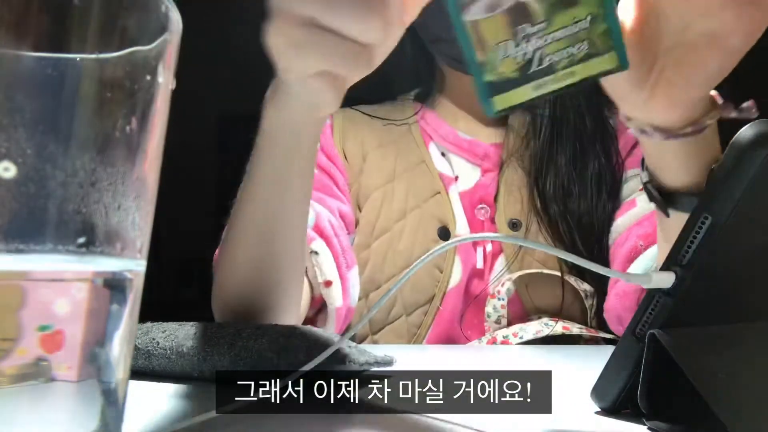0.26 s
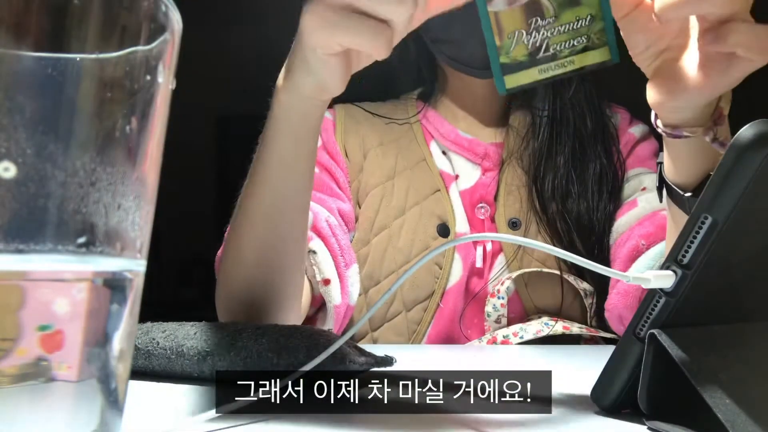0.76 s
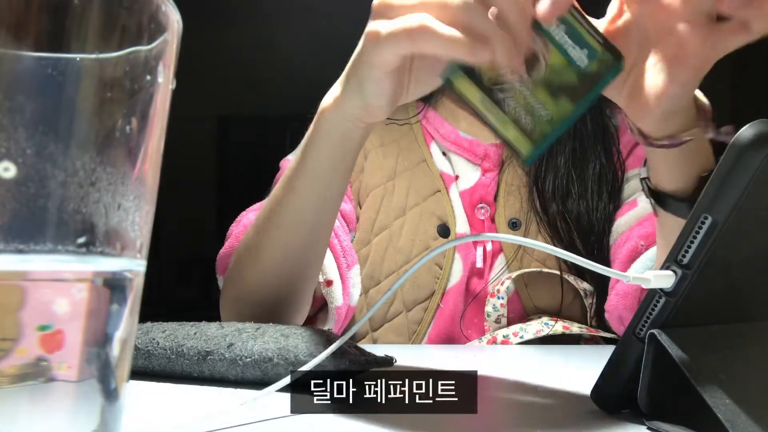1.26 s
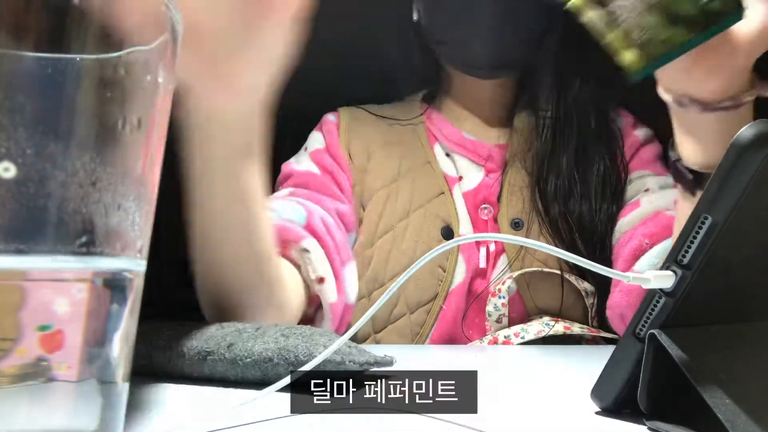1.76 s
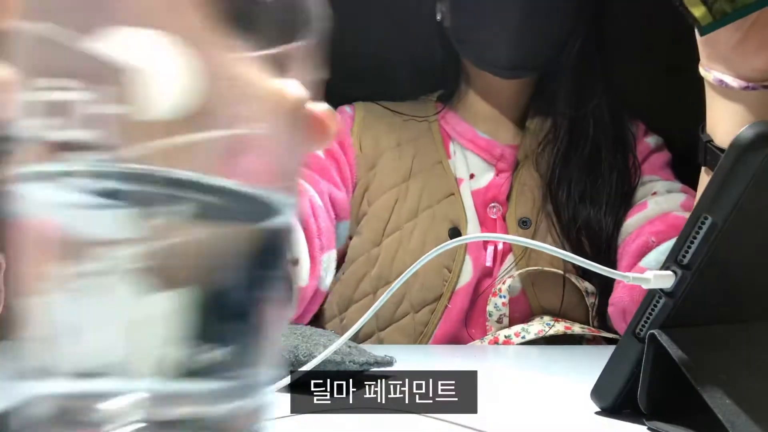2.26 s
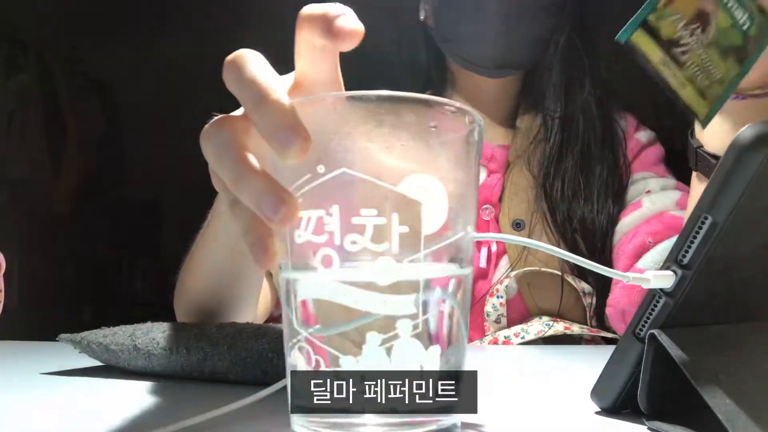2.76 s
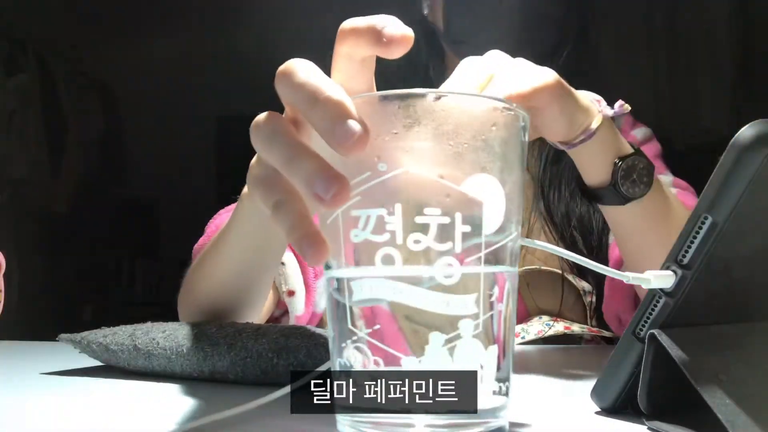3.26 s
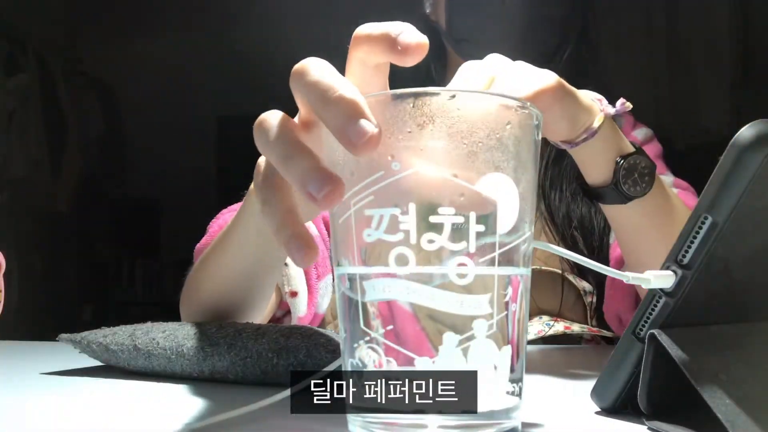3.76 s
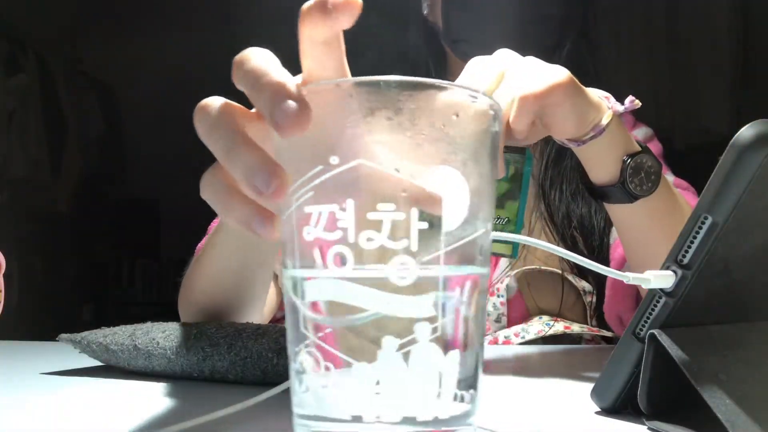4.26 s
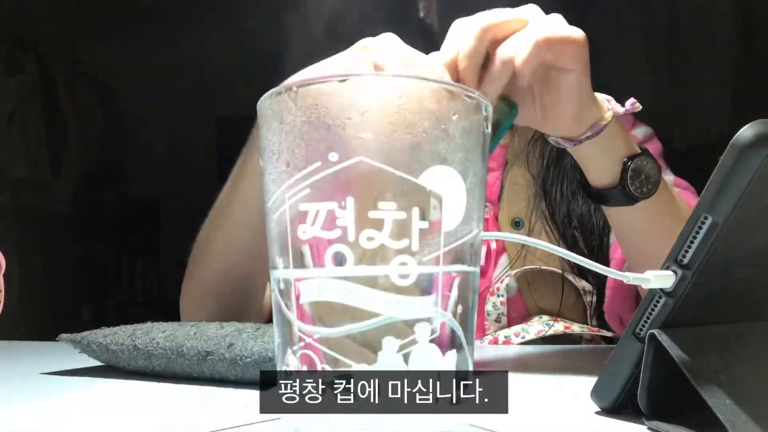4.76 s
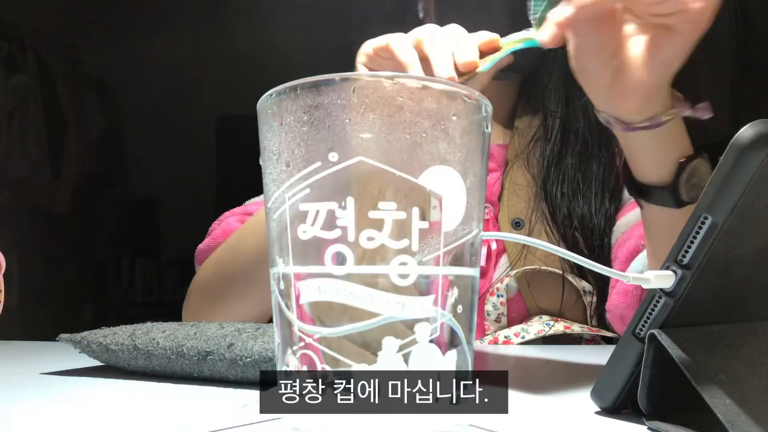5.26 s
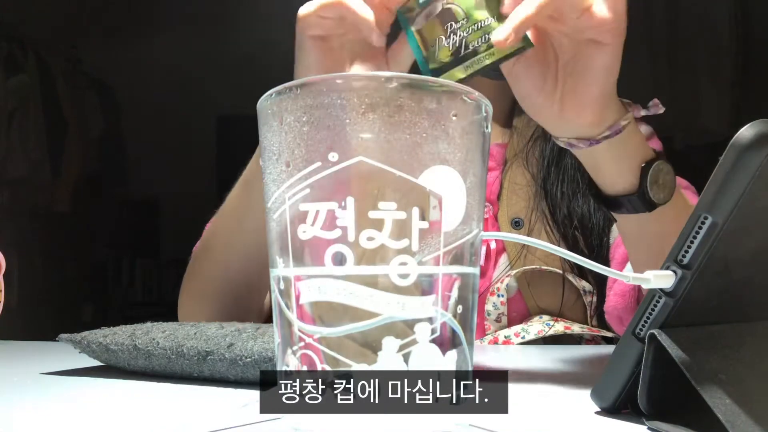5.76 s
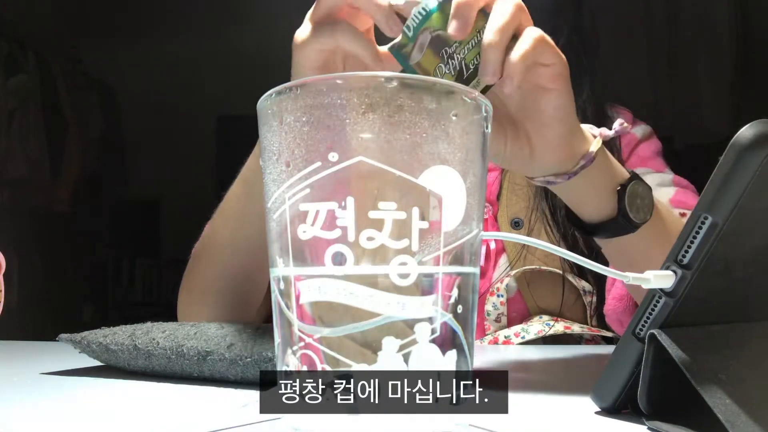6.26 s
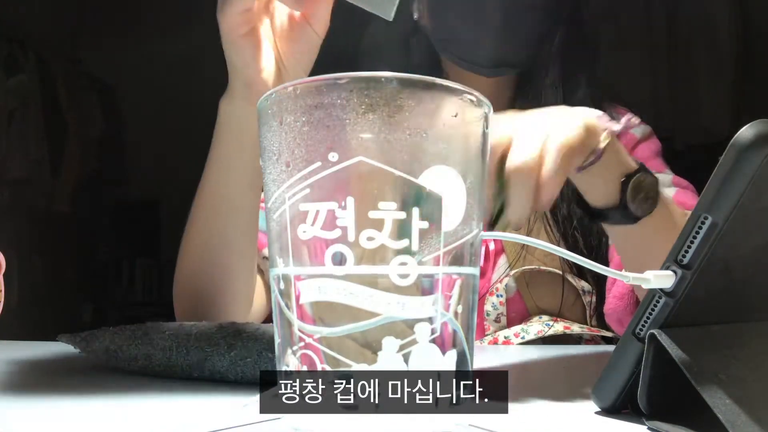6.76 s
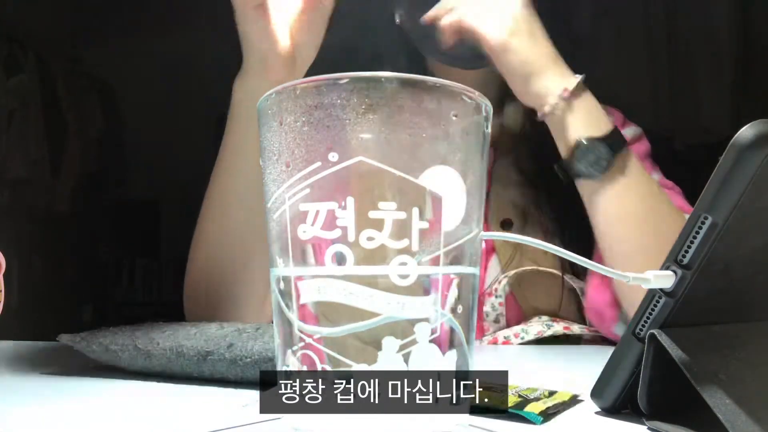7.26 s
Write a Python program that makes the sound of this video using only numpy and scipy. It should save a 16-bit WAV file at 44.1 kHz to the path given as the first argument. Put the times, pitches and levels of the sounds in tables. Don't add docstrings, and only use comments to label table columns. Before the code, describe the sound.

Dry foil sachet crackles in the hands, a full glass knocks hard on a table and scrapes, then the foil tears open with bright crinkles.

```python
import sys
import numpy as np
from scipy import signal
from scipy.fft import rfft, irfft, next_fast_len
from scipy.io import wavfile
from scipy.ndimage import uniform_filter1d, map_coordinates

SR = 44100
rng = np.random.default_rng(int(sys.argv[2]) if len(sys.argv) > 2 else 0)


def materialize(psi):
    bounded = np.clip(np.atleast_2d(psi).T, -1, 1)
    quanta = np.round(bounded * 32767).astype(np.int16)
    wavfile.write(sys.argv[1], SR, quanta)


def magnitude_from_level(level_db):
    exponent = np.asarray(level_db, float) / 20
    return 10 ** exponent


N = 330750

# (ring life [s], ring pitches [Hz])
PANELS = [
    (0.00029, [2103, 2164]),
    (0.00014, [3290, 3930, 4500, 4800]),
    (0.00035, [6020, 6700, 6820, 8110]),
    (0.00032, [9210, 10500, 11430, 12870, 14020, 15960]),
]
PANEL_DB = [-7.5, 1, -2.5, 2.5]
# (time [s], peak level [dB], brightness [dB per panel size], own pitch [Hz])
SHOWING_CREASES = [(.323, -44.5, 2.5, 4240), (.3389, -47.5, -4, 4440), (.3744, -36, -3.5, 6700),
                   (.381, -40, -12, 2320), (.386, -47.5, -1, 1510), (.7948, -46.5, -11, 1950),
                   (.8565, -45, -6, 716), (1.0422, -54.5, -5, 1420), (1.0681, -39, 2, 4620),
                   (1.1112, -38, 0, 4500), (1.22, -42, -11, 4260), (1.2298, -34, 0, 9440),
                   (1.2594, -35, -7, 2238), (1.2958, -50, -6, 2990), (1.3269, -44.5, -1.5, 1090),
                   (1.3602, -39.5, -2, 2930), (1.4512, -49, .1, 1640), (1.4616, -43, 6, 4500),
                   (1.474, -39, -18, 4000), (1.479, -34.5, -1, 3880), (1.495, -48, 2, 4600),
                   (1.504, -51, 6, 4760), (1.517, -46, 2, 4260), (1.5243, -53, 3, 10500),
                   (1.5445, -43, 4, 4300), (1.605, -42, 0, 1240), (1.6101, -43, -2, 12300),
                   (1.6626, -50, -8, 4070), (2.1041, -51, -6, 710), (2.7825, -52, 4.5, 3400)]
# (time [s], peak level [dB], brightness [dB per panel size], own pitch [Hz])
OPENING_CREASES = [(4.5925, -42.5, -24, 1110), (4.592, -40.5, -2, 4060), (4.7577, -43.5, -4.5, 2070),
                   (4.7765, -32.5, -4.5, 6000), (4.8016, -43, -7, 4430), (4.815, -38, 0, 1210),
                   (4.824, -39, 5, 6200), (4.8298, -39, 0, 6200), (4.838, -37, -2, 6130),
                   (4.8443, -35, -6, 4400), (4.8462, -33.5, 0.5, 2020), (4.888, -42.5, 0.5, 2050),
                   (4.947, -53, 6, 12000), (4.957, -49, 7, 6160), (4.973, -37.5, 6, 2040),
                   (5.033, -28, 14, 13300), (5.063, -41.5, 1.5, 4450), (5.0839, -47, 6, 12600),
                   (5.105, -43, 12, 12700), (5.123, -47, 4, 12900), (5.2175, -44.5, 1, 4000),
                   (5.24, -58, 6, 12500), (5.256, -55.5, -2, 1880), (5.4107, -52, -3, 2010),
                   (5.4183, -36, -5, 5800), (5.4513, -55, -12, 2000), (5.462, -49, -5, 1880),
                   (5.481, -51, 0.5, 4500), (5.538, -38.5, -1, 6070), (5.55, -44.5, -1, 1120)]
# (time [s], peak level [dB], brightness [dB per panel size], own pitch [Hz])
EMPTYING_CREASES = [(5.669, -50.5, -5.5, 1900), (5.675, -46.5, -11, 1940), (5.721, -39.5, -1.5, 2000),
                    (5.7208, -41, -1.5, 770), (5.695, -58, -4, 1950), (5.7447, -50, -2.5, 2020),
                    (5.804, -47.5, -13, 1120), (5.8624, -50, -4.5, 2150), (5.882, -34.5, -6.5, 4250),
                    (5.942, -48, -2, 2200), (6.118, -46, -5, 6300), (6.121, -55, -8, 1930),
                    (6.158, -35, 0.6, 1860), (6.1686, -53, .1, 2450), (6.188, -45, -2.5, 2040),
                    (6.2076, -41.5, -5, 740), (6.4408, -39.5, -0.5, 2030), (6.589, -52, -1.5, 2020),
                    (6.602, -46.5, 0, 6160), (6.609, -49.5, -1, 5930), (6.9846, -49, -7, 1210),
                    (7.026, -46, -5, 800), (7.04, -45, 4, 11900), (7.0585, -37, -10, 1230),
                    (7.057, -34.5, 8, 9400), (7.0863, -42.5, -2, 4000), (7.0883, -39, -10, 1290),
                    (7.093, -44, -19, 700), (7.1133, -53, -3.5, 734)]
# (time [s], peak level [dB], brightness [dB per panel size], own pitch [Hz])
MORE_CREASES = [(1.4674, -52, 0, 4770), (1.4912, -46.5, 3, 3140), (1.5127, -55, 0, 4500), (1.531, -55, 1, 3530),
                (1.587, -58, 6, 13500), (4.615, -60, 2.5, 5470), (4.671, -64, -1.5, 4030), (4.716, -62, -1, 6300),
                (4.727, -61, -4, 4500), (4.765, -46.5, -10.5, 1010), (4.8125, -40, -6, 4400),
                (4.835, -51, -4, 6170), (4.8543, -37, -7.5, 4230), (4.8605, -43, 8, 6160),
                (4.8976, -47, 1.5, 6190), (4.9321, -56, 8, 11350), (4.9368, -57, 9, 11950),
                (4.9505, -49, 8, 14600), (4.9856, -36, 7, 8300), (4.9973, -42, 5, 13900), (5.0083, -41, 5, 12200),
                (5.03, -48, -4, 4100), (5.0372, -46, 4, 8400), (5.0497, -36, 8, 12430), (5.0749, -43, 8, 13100),
                (5.1418, -53, 10, 13160), (5.1464, -49, 6, 14800), (5.213, -57, -12, 2000), (5.366, -65, 6, 12000),
                (0.375, -38.5, 0, 3060), (5.392, -58, -2, 4500), (5.493, -55, -2, 2000), (5.533, -58, 2, 6060),
                (5.667, -56, -3, 14000), (6.1992, -60, 0, 6100), (6.4516, -57, -3, 4770), (6.567, -53, -14, 2000),
                (1.207, -61, 1, 10500), (1.2165, -57, -7, 8000), (.3715, -38.5, 1, 5230), (7.0265, -49, -9, 2480),
                (7.081, -57, 3, 7000), (7.0285, -47, -14, 900), (7.092, -46, -16, 1290)]
# (frequency [Hz], level [dB per Hz])
FOIL_BODY = [(1800, -44), (2600, -1), (3400, 0), (4300, -1.5), (4950, 2.5), (5500, -2), (6100, -1),
             (6600, -9.5), (7300, -3), (8000, -26)]
# (frequency [Hz], level [dB per Hz])
FOIL_SIZZLE = [(7000, -48), (7550, -17), (8050, -2.5), (8700, -12), (9900, -8.5), (11000, -8),
               (13300, -2.5), (14800, -7.5), (15700, -6.5), (16200, -41.5)]
# (frequency [Hz], level [dB per Hz])
FOIL_RASP = [(400, -3.5), (700, 5.5), (1200, 1), (2000, -0.5), (2500, -2), (3000, -47)]
# (frequency [Hz], width [Hz], share lost [0 to 1])
SHADOWS = [
    (5530, 210, 0.38),
    (7440, 400, 0.37),
    (16200, 700, 0.55),
]
# (peak time [s], rise [s], fall [s], level [dB], brightness [dB])
RUBS = [(.31, 0.034, 0.077, -74, -15), (.385, 0.012, 0.01, -57.5, -21), (1.222, 0.01, 0.027, -57, 0),
        (1.452, 0.012, 0.17, -59.5, -5.5), (1.495, 0.12, 0.13, -65.5, 0), (1.61, 0.091, .05, -65, -3),
        (5.22, 0.022, .025, -62, -6), (5.28, 0.098, 0.059, -68.5, 1), (5.43, 0.11, .3, -69.5, -7),
        (5.54, 0.29, 0.16, -68.5, -4), (5.73, 0.34, 0.39, -74, -7), (5.92, 0.97, 0.14, -74.5, 0),
        (6.17, 0.051, 0.13, -64, -7), (6.25, 0.38, .05, -66.5, -3), (6.37, 0.15, 0.37, -69.5, -2),
        (6.455, 0.074, .05, -72, -5), (6.54, .1, 0.18, -75, 5), (6.605, 0.094, .018, -63.5, 1.5),
        (6.86, .04, .06, -73.5, 3), (6.931, .008, 0.094, -64, -3), (6.954, 0.087, 0.012, -77, -6),
        (6.985, 0.073, .04, -74, 5), (7.095, 0.035, 0.065, -69, 5)]
# (peak time [s], rise [s], fall [s], level [dB], brightness [dB])
TEAR_SURGES = [(4.78, 0.041, 0.074, -61, 1), (4.846, 0.011, 0.11, -50.5, 2),
               (4.885, 0.057, 0.041, -56.5, 5.5), (4.948, .008, .2, -64, 7), (4.975, .012, .1, -52.5, 6),
               (4.999, 0.063, 0.15, -50, 6), (5.03, 0.074, 0.2, -58.5, -4.5), (5.07, .1, 0.05, -63.5, 12.5),
               (5.13, .04, 0.072, -60, 4.5), (5.159, 0.15, 0.015, -63.5, -4.5)]
# (peak time [s], rise [s], fall [s], level [dB], pitch [Hz])
TAUT_PANELS = [(1.456, .015, .09, -65, 6500), (1.548, .02, 0.037, -74, 6400),
               (1.606, 0.025, .03, -75, 7040), (4.83, 0.027, 0.06, -47.5, 6150),
               (4.85, 0.028, 0.069, -49, 4260), (4.86, 0.046, 0.083, -53, 6150),
               (4.955, 0.03, .04, -60, 5960), (4.985, 0.041, .08, -62, 8250),
               (5.025, 0.079, 0.1, -51, 4500), (5.03, .1, 0.11, -54, 4040), (1.5, 0.12, .15, -66, 4910),
               (1.53, .15, .06, -77, 6500), (5.065, .04, 0.15, -57.5, 9000), (5.155, .05, 0.021, -61, 2280),
               (5.28, 0.09, 0.053, -74, 4500), (5.28, .08, .06, -72, 14030), (5.82, 0.078, .03, -66, 2100),
               (5.925, 0.029, 0.067, -64, 6200), (6.24, 0.083, .08, -67.5, 5950),
               (6.4, .25, 0.11, -75.5, 7960), (6.46, .03, 0.047, -66, 4500), (6.59, 0.16, .05, -68, 6060),
               (6.945, 0.025, 0.024, -57.5, 6800), (6.942, 0.038, 0.058, -66, 8800),
               (6.95, 0.038, 0.024, -63.5, 4150), (7.095, 0.039, 0.023, -61, 3690),
               (6.23, .1, .06, -67, 7840), (6.56, .15, 0.092, -73, 7930), (4.87, 0.044, 0.036, -56, 1463),
               (5.03, 0.11, 0.11, -55.5, 2180)]
# (time [s], peak level [dB], pitch [Hz])
FACETS = [(.3744, -54, 13300), (1.0685, -54, 9500), (1.0681, -51, 12000), (1.2298, -45, 10720),
          (1.2576, -50, 8660), (1.3602, -57, 9800), (1.36, -48, 12200), (4.591, -58, 3900),
          (4.7766, -49.5, 11540), (4.7769, -44, 13200), (4.778, -49, 1100), (5.4188, -50, 10740),
          (5.4188, -52, 13970), (5.883, -50.5, 6180), (6.158, -44, 4800), (6.157, -47, 12700),
          (6.4405, -40, 4770), (6.4408, -47.5, 10700), (5.065, -48, 8950), (5.038, -41, 12600),
          (1.504, -49, 4740), (1.504, -52, 13500), (4.132, -49, 2050), (4.131, -61, 4700),
          (4.052, -54, 1960), (1.0683, -51, 14000), (1.23, -46, 6900), (4.7567, -44, 4150),
          (4.757, -50, 7000), (4.838, -39, 13300), (4.8445, -42, 12300), (6.4406, -41, 4170),
          (6.4408, -45, 8030), (7.087, -43, 3840), (7.0872, -51, 14400), (7.0876, -44, 584),
          (2.5481, -54.5, 4380), (5.7212, -46, 6400)]
# (pitch [Hz], level [dB], time to fade by 60 dB [s])
TABLE_RINGS = [(153, 1, 0.063), (212, 2, 0.028), (249, 0, 0.059), (335, -3.5, 0.023), (428, 3, 0.035),
               (478, -2, 0.05), (590, -9, 0.048), (617, -24.5, 0.0489), (768, -2.5, 0.03), (920, -7, 0.019),
               (1060, -10, 0.01), (1210, -1, 0.015), (1335, -17.5, 0.035), (1580, -13, 0.023),
               (1984, -4.5, 0.014), (2810, -15.5, 0.018), (3370, -35, 0.092), (4890, -8.5, 0.0064),
               (6150, -18, 0.0077), (8250, -13.5, 0.0038)]
# (time [s], force [dB], contact hardness [Hz])
KNOCKS = [(2.438, -38, 710), (2.4428, -16.5, 3000), (2.4465, -35.5, 1300), (2.458, -41, 590),
          (2.478, -29.5, 1100), (2.5489, -36, 2970), (2.551, -25, 680), (2.565, -53, 600),
          (2.703, -40, 249), (2.001, -40, 296), (7.023, -48, 900), (7.089, -48.5, 1500)]
# (peak time [s], rise [s], fall [s], level [dB], brightness [dB])
SLIDE_SURGES = [(2.07, 0.15, .06, -53.5, -32), (2.102, 0.056, 0.064, -45, -22),
                (2.452, 0.0072, 0.062, -44, -2), (2.48, .006, 0.047, -54, -6),
                (2.556, 0.0072, 0.026, -56, 3), (2.58, 0.074, 0.13, -46, -17),
                (2.72, 0.085, 0.17, -61.5, -13), (2.915, 0.053, 0.24, -48, -13.5),
                (2.97, 0.17, 0.13, -47.5, -12), (3.01, 0.36, 0.11, -50, -22),
                (3.24, 0.19, 0.22, -60.5, -12), (3.32, .1, 0.078, -65, -4.5), (4.02, 0.3, .1, -63.5, -10),
                (4.062, 0.038, 0.14, -52.5, -8.5), (4.105, 0.14, 0.39, -47, -17),
                (4.145, 0.27, 0.14, -50, -6.5), (4.225, 0.28, 0.054, -55, -4.5),
                (4.285, .1, 0.076, -64, -4)]
# (peak time [s], rise [s], fall [s], level [dB], pitch [Hz])
CHATTER = [
    (2.1, .09, .09, -47, 490),
    (4.105, .12, .22, -47, 255),
    (4.143, .04, .12, -48, 420),
    (4.232, .3, .04, -49, 500),
    (4.285, .05, .05, -60, 430),
]
# (time [s], peak level [dB], pitch [Hz])
THUMPS = [(0.159, -40.5, 101), (0.282, -50, 131), (1.218, -44.5, 125), (1.455, -44, 130), (2.043, -34, 420),
          (2.056, -36.5, 406), (6.601, -57, 209), (2.1, -45, 104), (2.909, -46, 115), (2.4436, -25, 425),
          (2.4446, -36, 232), (2.5635, -35, 392)]
# (frequency [Hz], time to fade by 60 dB [s])
ROOM_FADE = [(200, 0.13), (2000, 0.034), (12000, 0.043)]
# (frequency [Hz], level [dB per Hz])
AIR_COLOUR = [(15, -75), (25, -30), (117, 1), (231, -4), (279, -3), (311, -4.5), (420, -4.5), (536, -4),
              (742, -6), (1240, -9), (1590, -12), (1720, -10.5), (3390, -18.5), (9200, -24.5),
              (9900, -29.5), (10600, -24.5), (12800, -26), (15850, -28.5), (16050, -47.5)]

FADE_DB = 33.5


def snaps():
    own_db = 7
    out, t = np.zeros(N + SR), np.arange(660) / SR
    strain = np.zeros(N)
    creases = SHOWING_CREASES + OPENING_CREASES + EMPTYING_CREASES + MORE_CREASES
    chance = rng.random((len(creases), len(PANELS), 6, 4))
    for (s, peak_db, bright_db, own_hz), draw in zip(creases, chance):
        lean_db = bright_db * np.arange(len(PANELS)) + PANEL_DB
        own = np.searchsorted([3200, 5500, 8600], own_hz)
        lean_db[own] += own_db
        levels = peak_db + lean_db - lean_db.max()
        strain[round(s * SR)] = magnitude_from_level(levels[1:].max() - 22.5)
        for k, (db, (life, pitches), rings) in enumerate(zip(levels, PANELS, draw)):
            bend, strength, phase, late = rings[:len(pitches)].T[..., None]
            hz = np.array(pitches)[:, None] * (1 + 0.075 * (bend - .5))
            if k == own:
                hz[0], strength[0] = own_hz, 0
                strength[1:] += 0.44 * (own_hz < 1600)
            u = np.maximum(t - 0.0008 * late, 0) / life
            swing = np.sin(2 * np.pi * (hz * t + phase))
            flick = np.sum(magnitude_from_level(-13 * strength) * u ** 2 * np.exp(-u) * swing, axis=0)
            out[round((s - .0013) * SR):][:len(t)] += magnitude_from_level(db + 2.0) * flick / abs(flick).max()
    swell = signal.oaconvolve(strain, np.exp(-abs(t - t.mean()) / 0.0031), "same")
    creep = unit(filtered(grit(9000, spread_db=5, clump_db=3), creep_colour))
    return filtered(out[:N], lambda hz: table_mirror(hz) * hand_shadow(hz)) + swell * creep


def creep_colour(hz):
    seam_hz, width_hz, seam_db = 6280, 140, 9
    seam = magnitude_from_level(seam_db) / (1 + (2 * (hz - seam_hz) / width_hz) ** 2)
    total = magnitude_from_level(along(FOIL_BODY, hz)) + seam + magnitude_from_level(along(FOIL_SIZZLE, hz) - 2.5)
    return total / (1 + (4500 / (hz + 1)) ** 6)


def table_mirror(hz):
    delay_s, gain, blur_hz = 0.000468, 0.076, 10800
    bounce = gain * np.exp(-2j * np.pi * hz * delay_s) / (1 + (hz / blur_hz) ** 4)
    return 0.94 + bounce / (1 + (2300 / (hz + 1)) ** 4)


def hand_shadow(hz):
    dips = [1 - min(share, 1) / (1 + ((hz - c_hz) / w_hz) ** 2) for c_hz, w_hz, share in SHADOWS]
    return np.prod(dips, axis=0)


def rustle():
    rasp_lean = 0.87
    rub_rasp_db, tear_rasp_db = -5, 0
    leans = [0, 1, -rasp_lean]
    rub_gains = strokes(RUBS, leans, [0, 0, rub_rasp_db])
    tear_gains = strokes(TEAR_SURGES, leans, [0, 0, tear_rasp_db])
    gains = np.maximum(rub_gains, tear_gains)
    shared = 0.53 * unit(grit(3000, spread_db=1.5, clump_db=1.0))
    layers = []
    for colour in (FOIL_BODY, FOIL_SIZZLE, FOIL_RASP):
        own_slips = unit(grit(7000, spread_db=2.5, clump_db=2.5))
        slips = patchy(shared + own_slips, 2, 7, 5)
        layers.append(unit(filtered(slips, lambda hz: magnitude_from_level(along(colour, hz)))))
    return np.sum(gains * layers, axis=0)


def taut_foil():
    return pitched_slips(TAUT_PANELS, width_hz=240, clump_db=3.0, tone=0)


def facets():
    out, t = np.zeros(N), np.arange(300) / SR
    u = t / 0.00067
    for s, db, hz in FACETS:
        ring = u ** 2 * np.exp(-u) * np.sin(2 * np.pi * hz * t)
        out[round((s - .0009) * SR):][:len(t)] += magnitude_from_level(db + 5.3) * ring
    return out


def glass():
    force = np.zeros(N)
    t = np.arange(900) / SR
    for s, db, hard_hz in KNOCKS:
        u = 2 * np.pi * hard_hz * t
        push = u ** 2 * np.exp(-u)
        force[round(s * SR):][:len(t)] += magnitude_from_level(db) * push / push.sum()
    return filtered(force, lambda hz: table_response(hz, damp=0.75, tilt_db=2.5))


def table_response(hz, damp, tilt_db):
    total = 0
    for k, (centre, db, t60) in enumerate(TABLE_RINGS):
        width = damp * np.log(1000) / (np.pi * t60)
        side = (-1) ** min(k, 17) if centre > 1000 else 1
        strength = side * magnitude_from_level(db + tilt_db * np.log2(centre / 500))
        total = total + strength * centre / (centre ** 2 - hz ** 2 + 1j * hz * width)
    radiation = (1j * hz / (100 + 1j * hz)) ** 5
    lag = np.exp(-2j * np.pi * 0.021 * np.sqrt(hz))
    earlier = np.exp(2j * np.pi * hz * 0.00024)
    return total * radiation * lag * earlier * SR / (2 * np.pi)


def slide():
    dull, bright = strokes(SLIDE_SURGES, [0, 1], [0, 0])

    def low_colour(hz):
        ring = table_response(hz, damp=1.0, tilt_db=-0.5)
        return ring / (1 + (hz / 800) ** 4) / (1 + (215 / (hz + 1)) ** 4)

    def high_colour(hz):
        rim = 1
        for c_hz, w_hz, gain in ((2040, 72, 0.0), (2700, 380, -.5), (3400, 43, 1.5)):
            rim = rim + gain / (1 + ((hz - c_hz) / w_hz) ** 2)
        ring = table_response(hz, damp=0.75, tilt_db=2.5) * rim
        return ring / (1 + (900 / (hz + 1)) ** 6) / (1 + (hz / 4000) ** 8)

    low = filtered(grit(700, spread_db=1.0, clump_db=-2.0), low_colour)
    high = filtered(grit(1500, spread_db=-1.5, clump_db=1.5), high_colour)
    return dull * steady(low) + bright * steady(high)


def chatter():
    return pitched_slips(CHATTER, width_hz=37, clump_db=4.0, tone=4)


def thumps():
    out, t = np.zeros(N), np.arange(4000) / SR
    for s, db, hz in THUMPS:
        u = t * np.sqrt(hz) / 0.065
        out[round(s * SR):][:len(t)] += magnitude_from_level(db + 4.5) * u * np.exp(-u) * np.sin(2 * np.pi * hz * t)
    return out


def room(x):
    out, hop = np.zeros(N + SR), SR // 5
    for start in range(0, N, hop):
        hz, t, z = signal.stft(rng.standard_normal(hop), SR, nperseg=128)
        fade = magnitude_from_level(-60 * t / along(ROOM_FADE, hz)[:, None])
        tail = signal.istft(z * fade, SR, nperseg=128)[1]
        wet = signal.fftconvolve(x[start:start + hop], tail / np.linalg.norm(tail))
        out[start + 40:][:len(wet)] += wet
    return out[:N]


def air():
    noise = patchy(rng.standard_normal(N), 1.2, 6, 14)
    return magnitude_from_level(-65) * unit(filtered(noise, lambda hz: magnitude_from_level(along(AIR_COLOUR, hz))))


def grit(rate, spread_db, clump_db):
    hit = rng.random(N) < rate / SR
    size_db = spread_db * np.minimum(rng.exponential(size=N), 3)
    size = magnitude_from_level(size_db) * np.sign(rng.standard_normal(N))
    clumps = map_coordinates(rng.standard_normal(N // 150 + 4), [np.arange(N) / 150])
    return hit * size * magnitude_from_level(clump_db * clumps)


def pitched_slips(rows, width_hz, clump_db, tone):
    out, t = np.zeros(N), np.arange(N) / SR
    slips = grit(4000, spread_db=3.5, clump_db=clump_db)
    slips = filtered(slips, lambda hz: 1 / (1 + (hz / width_hz) ** 3))
    slips = unit(tone + steady(slips))
    for k, (s, rise, fall, db, hz) in enumerate(rows):
        i = slice(round((s - 3 * rise) * SR), round((s + 3 * fall) * SR))
        away = np.maximum((s - t[i]) / max(rise, .002), (t[i] - s) / max(fall, .002))
        rough = np.roll(slips, 9001 * k)[i]
        out[i] += magnitude_from_level(db - FADE_DB * away + 3) * rough * np.sin(2 * np.pi * hz * t[i])
    return out


def strokes(rows, leans, offsets_db):
    gains = np.zeros((len(leans), N))
    for s, rise, fall, db, bright_db in rows:
        i = np.arange(max(round((s - 3 * rise) * SR), 0), min(round((s + 3 * fall) * SR), N))
        t = i / SR - s
        level_db = db - FADE_DB * np.maximum(-t / max(rise, .002), t / max(fall, .002))
        layer_db = (bright_db * np.array(leans) + offsets_db)[:, None]
        gains[:, i] = np.maximum(gains[:, i], magnitude_from_level(level_db + layer_db))
    return uniform_filter1d(gains, size=131, axis=1)


def patchy(x, depth_db, bins, frames):
    z = signal.stft(x, nperseg=512)[2]
    field = uniform_filter1d(rng.standard_normal(z.shape), bins, axis=0)
    field = uniform_filter1d(field, frames, axis=1)
    return signal.istft(z * magnitude_from_level(depth_db * unit(field)), nperseg=512)[1][:N]


def steady(x):
    return x / np.sqrt(abs(uniform_filter1d(x ** 2, size=2205)) + 1e-20)


def filtered(x, response):
    m = next_fast_len(N + SR // 4)
    return irfft(rfft(x, m) * response(np.fft.rfftfreq(m, 1 / SR)), m)[..., :N]


def along(points, hz):
    f, v = np.transpose(points)
    return np.interp(np.log(hz + 1), np.log(f + 1), v)


def unit(x):
    return x / np.sqrt(np.mean(x ** 2) + 1e-20)


def scene():
    foil = snaps() + rustle() + taut_foil() + facets()
    table = filtered(glass() + thumps(), lambda hz: (1j * hz / (45 + 1j * hz)) ** 2)
    scrape = slide()
    echoes = room(magnitude_from_level(-8.5) * foil + magnitude_from_level(-10.0) * table)
    return (foil + table + scrape + echoes + air() + chatter())[None]


def roll_off(x):
    return signal.sosfilt(signal.butter(12, 16490, fs=SR, output="sos"), x)


def record(dry):
    limit = 0.35

    def microphone(hz):
        return (1j * hz / (60 + 1j * hz)) ** 2 / (1 + (hz / 15900) ** 60) ** .5

    heard = filtered(dry, microphone)
    mix = heard / (1 + abs(heard / limit) ** 4) ** .25
    return roll_off(mix)


dry = scene()
out = record(dry)
materialize(out)
```